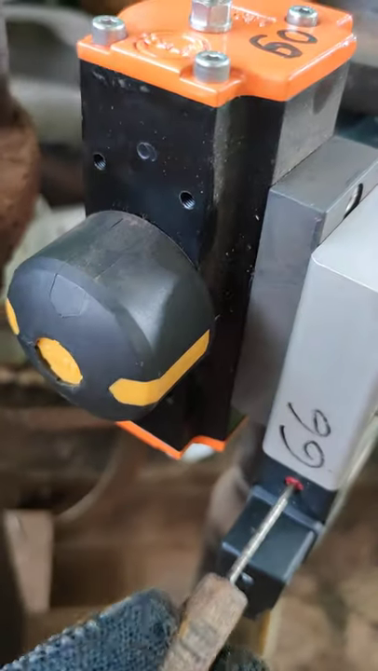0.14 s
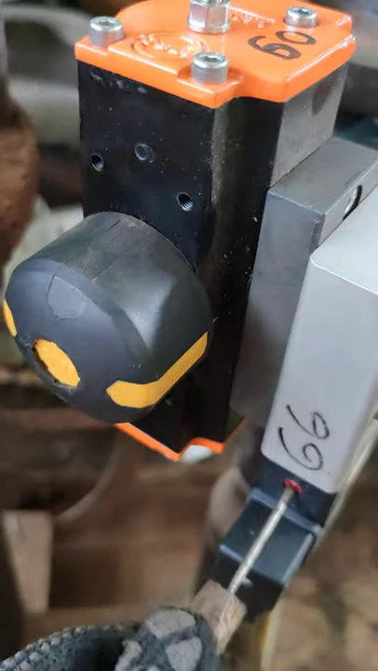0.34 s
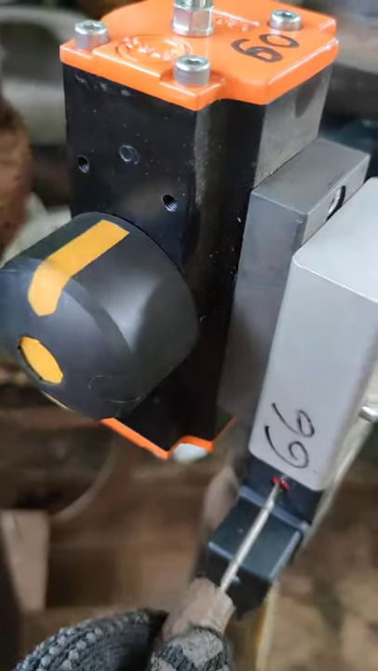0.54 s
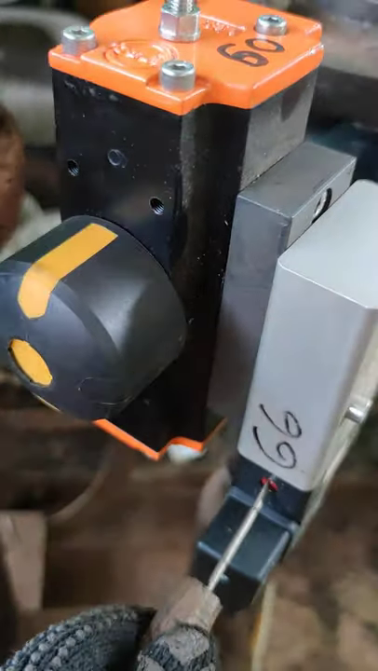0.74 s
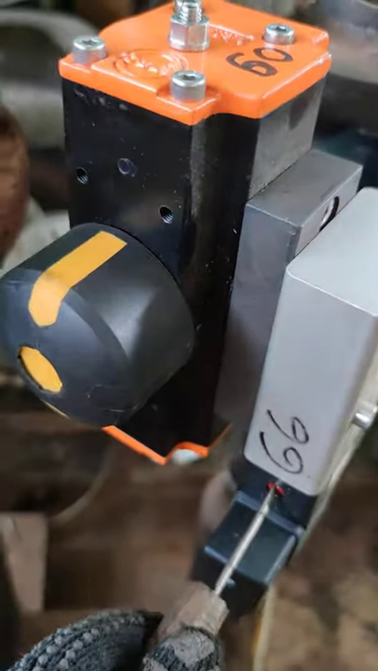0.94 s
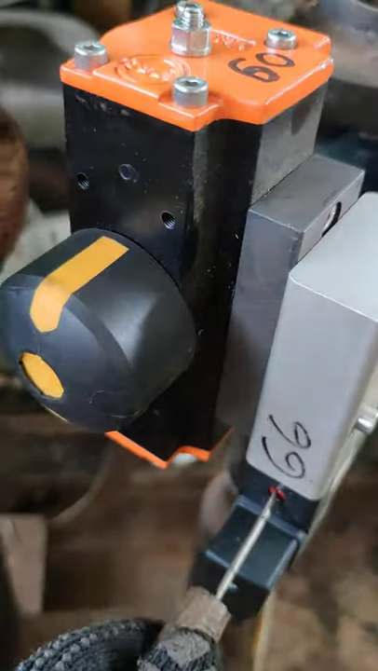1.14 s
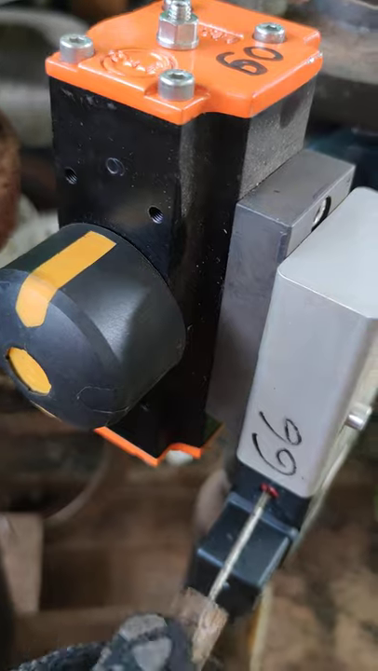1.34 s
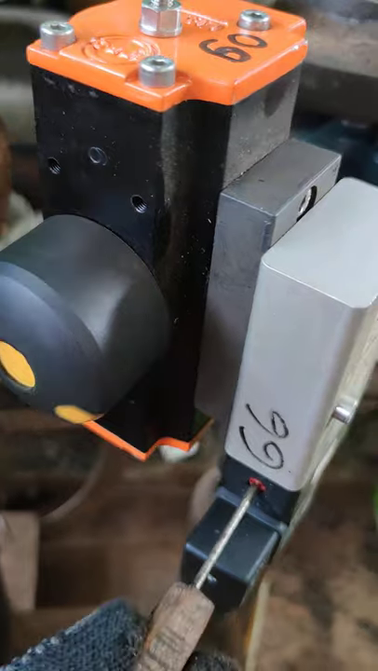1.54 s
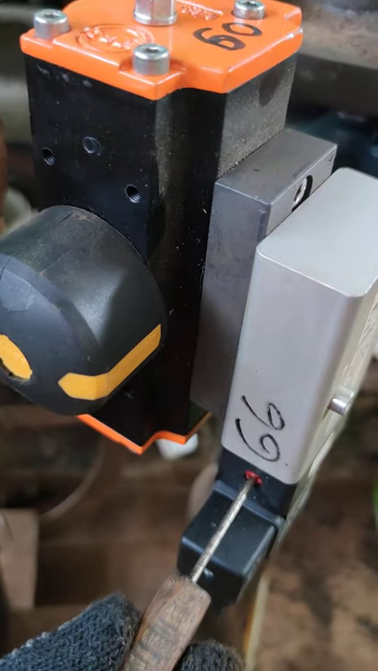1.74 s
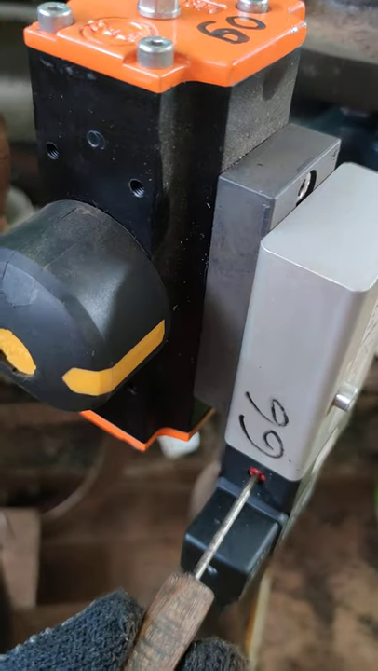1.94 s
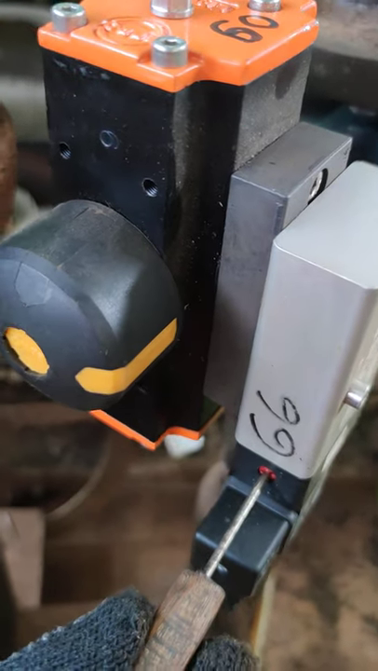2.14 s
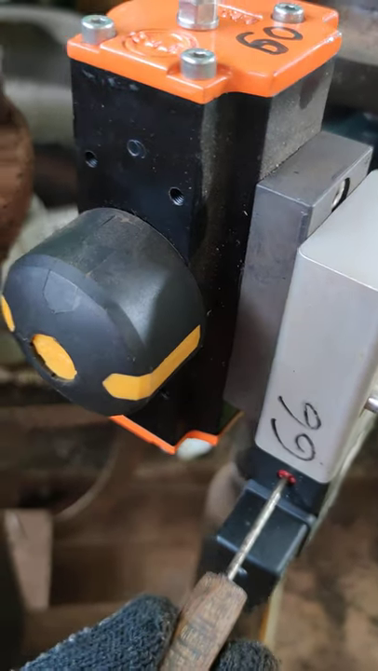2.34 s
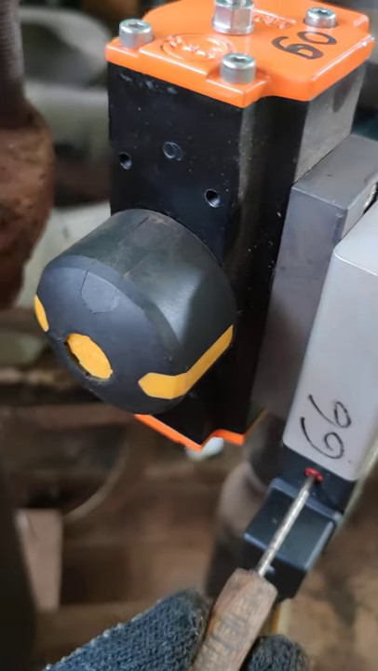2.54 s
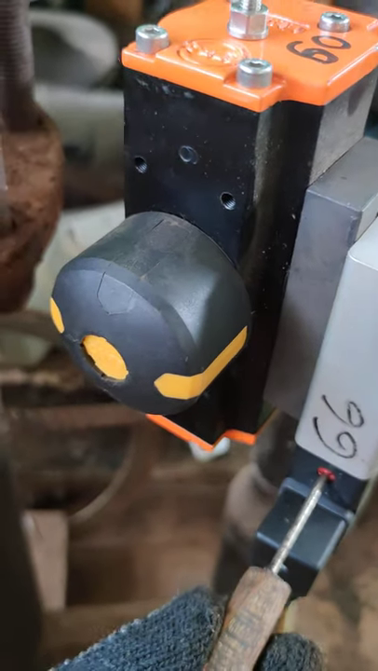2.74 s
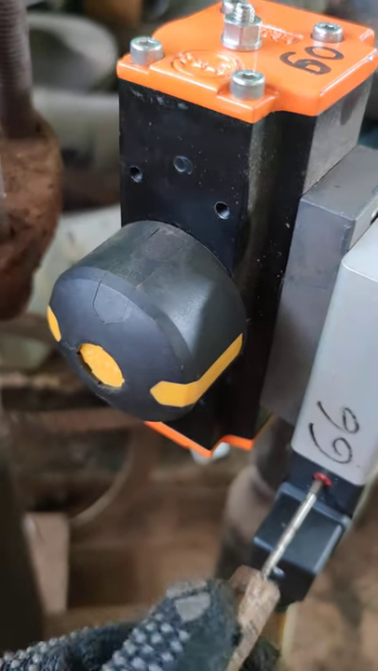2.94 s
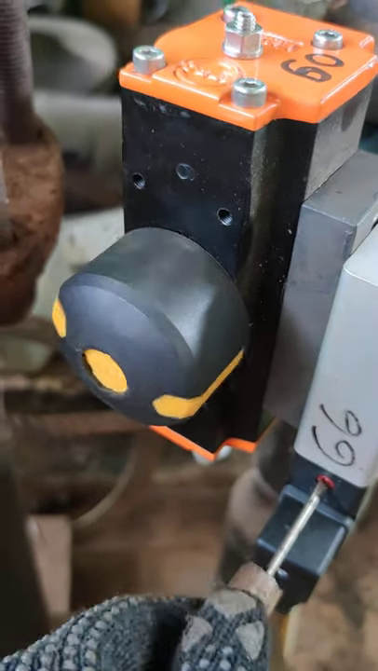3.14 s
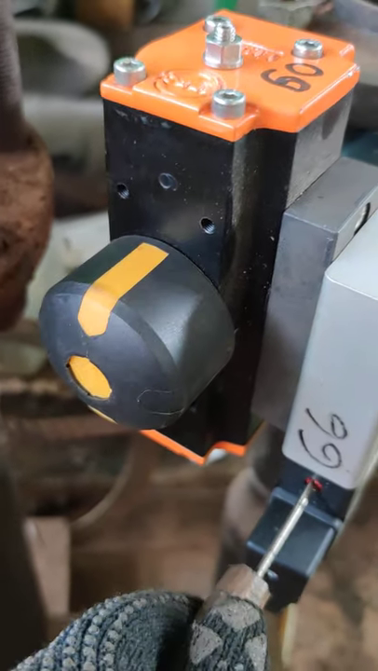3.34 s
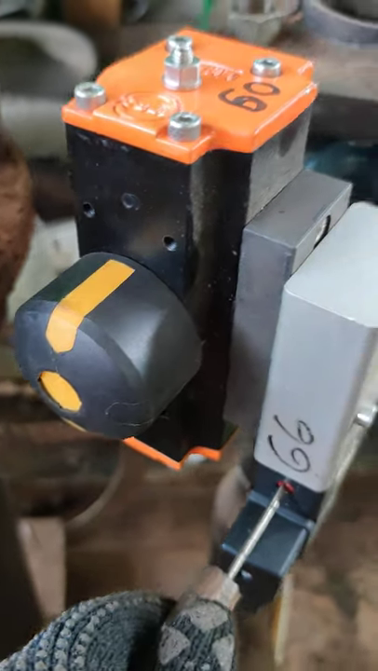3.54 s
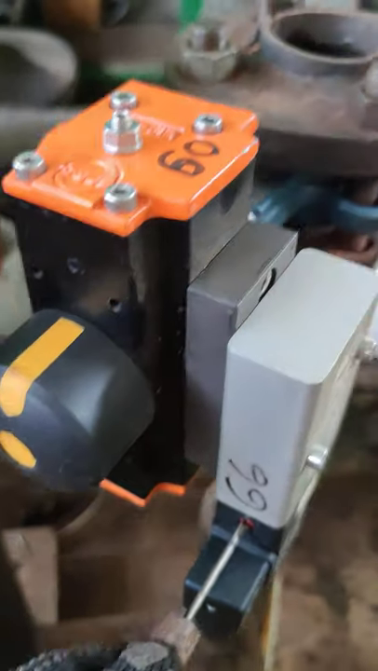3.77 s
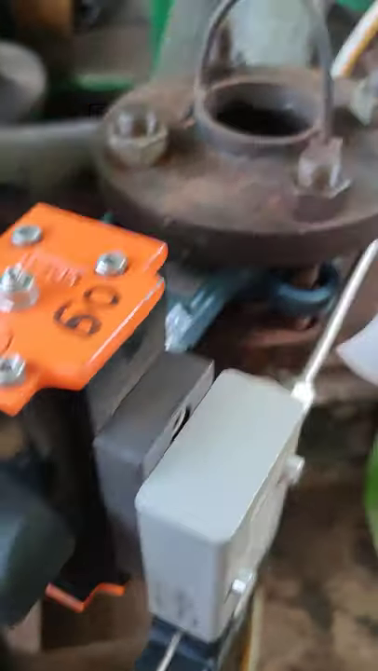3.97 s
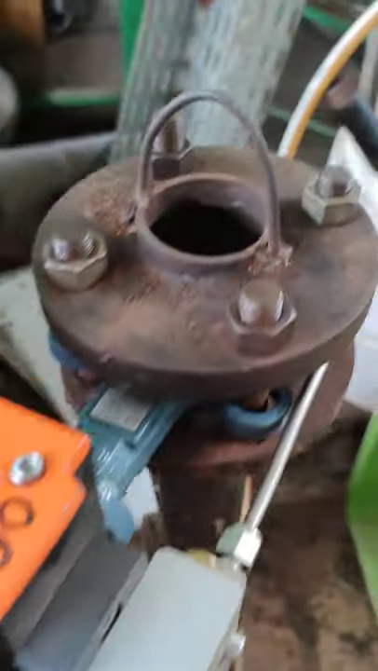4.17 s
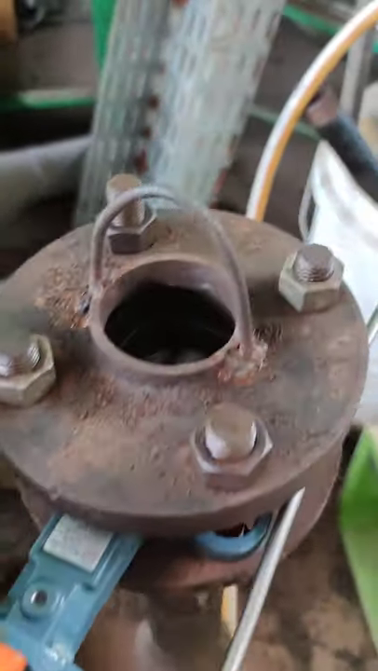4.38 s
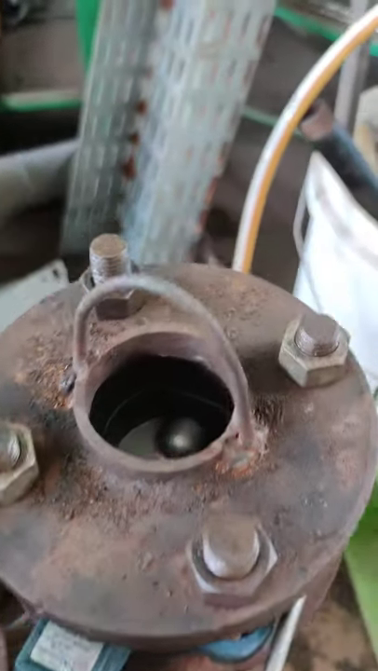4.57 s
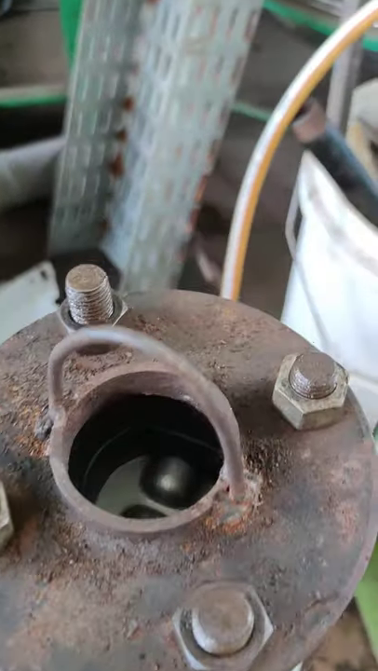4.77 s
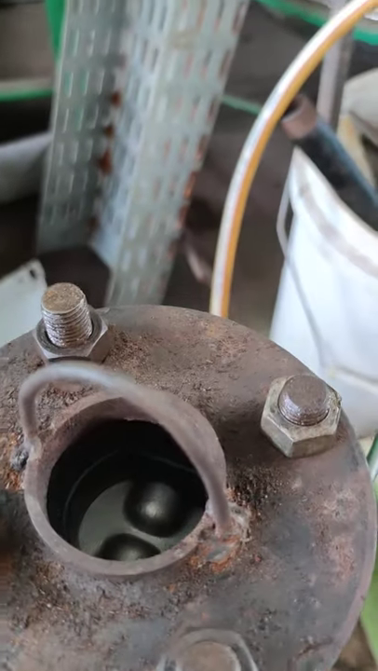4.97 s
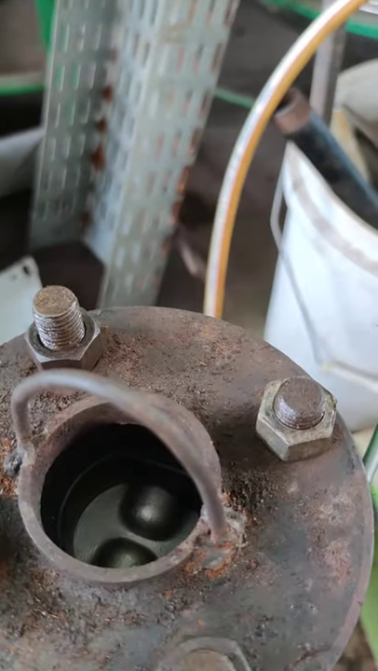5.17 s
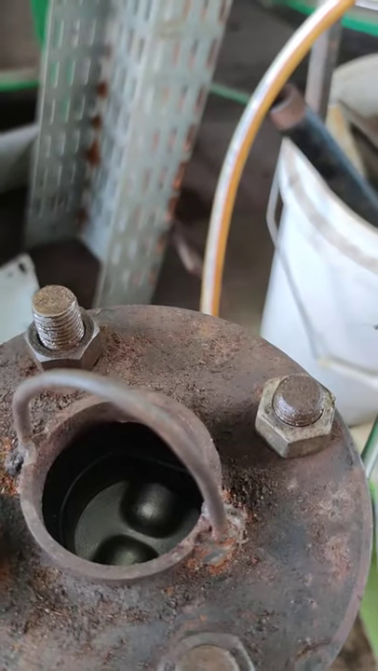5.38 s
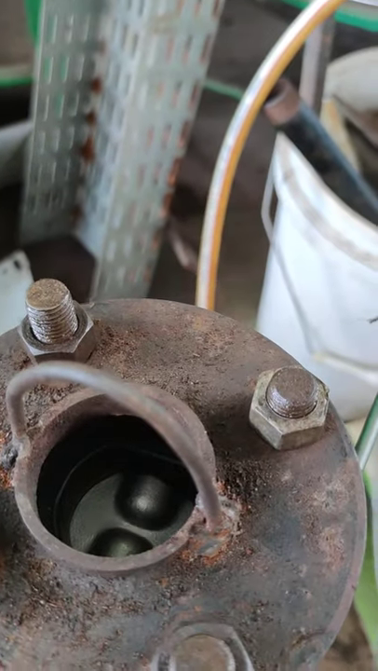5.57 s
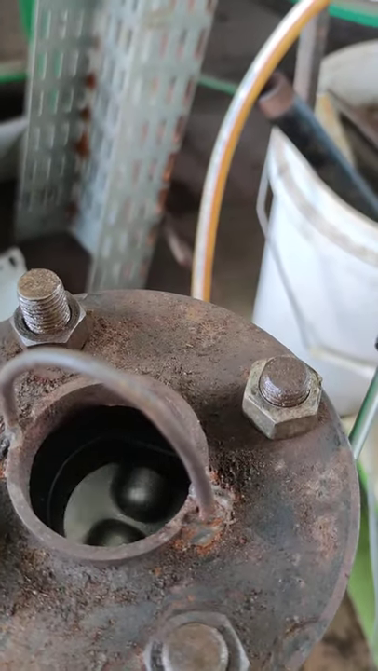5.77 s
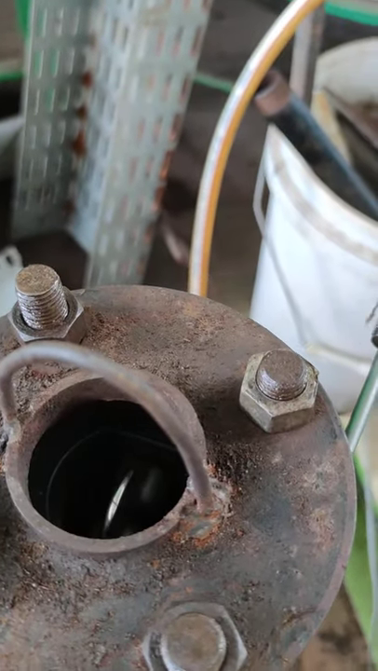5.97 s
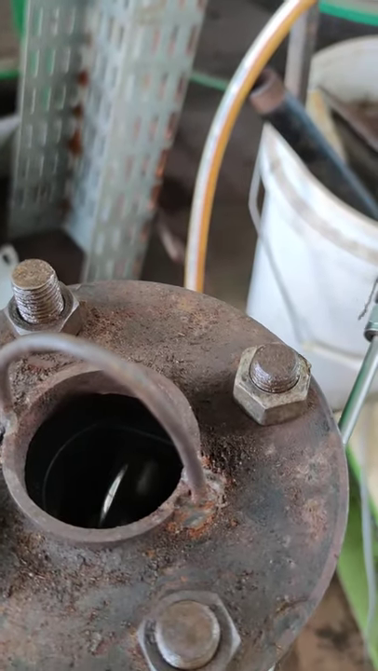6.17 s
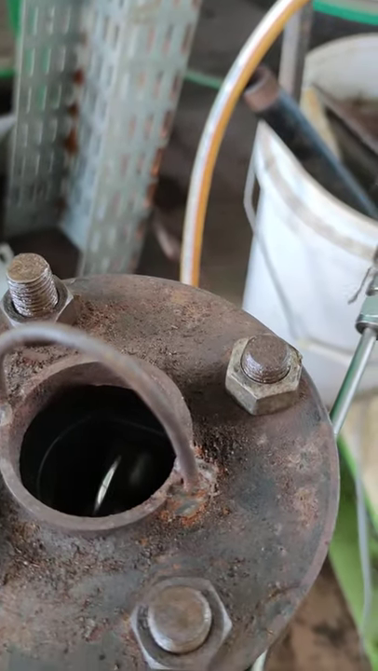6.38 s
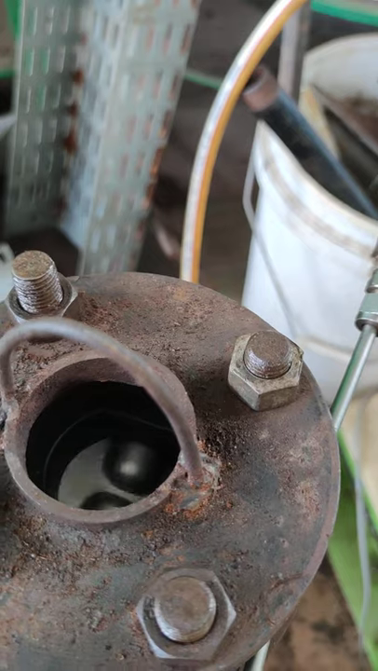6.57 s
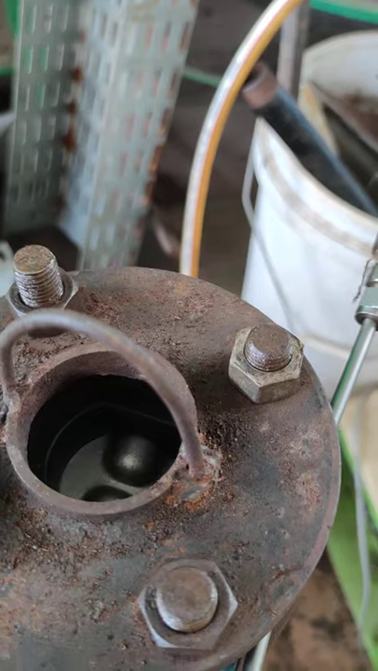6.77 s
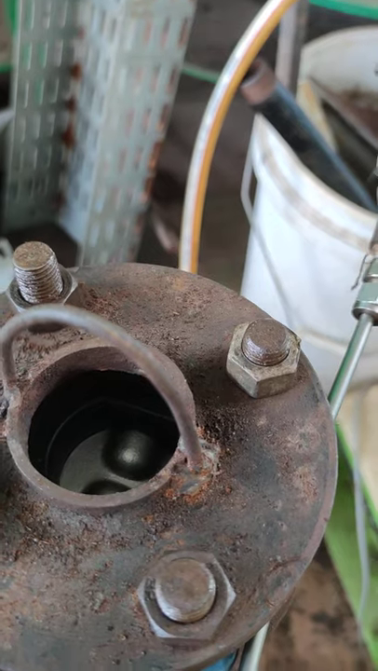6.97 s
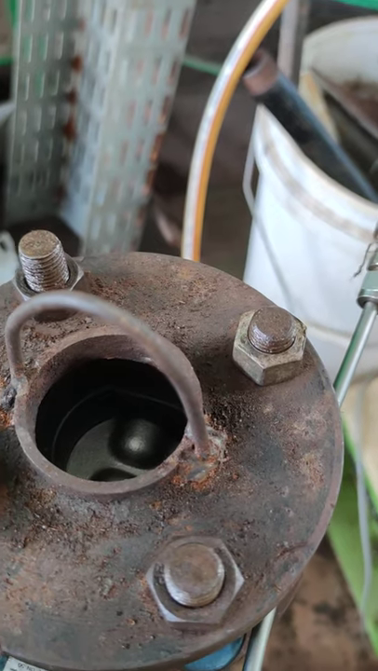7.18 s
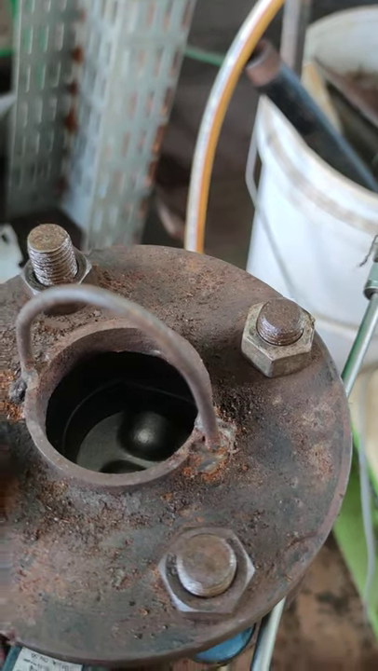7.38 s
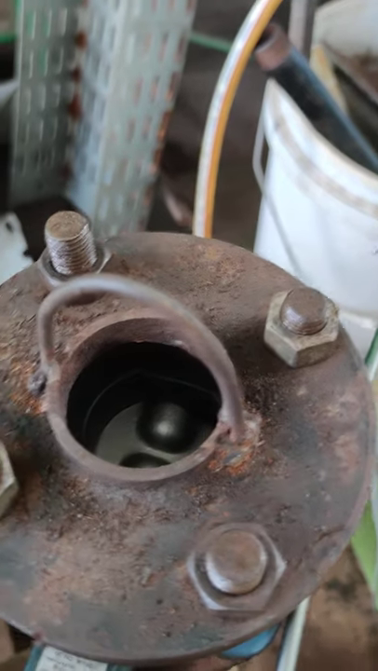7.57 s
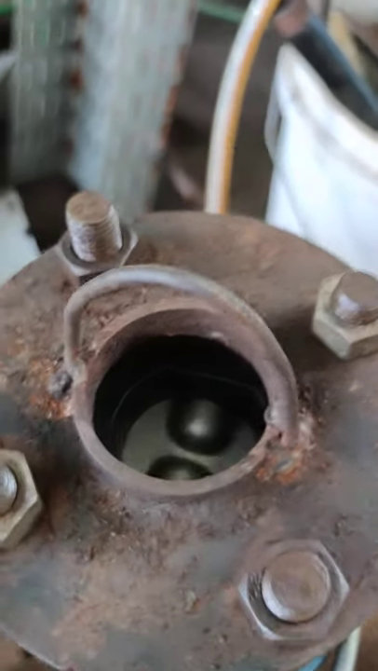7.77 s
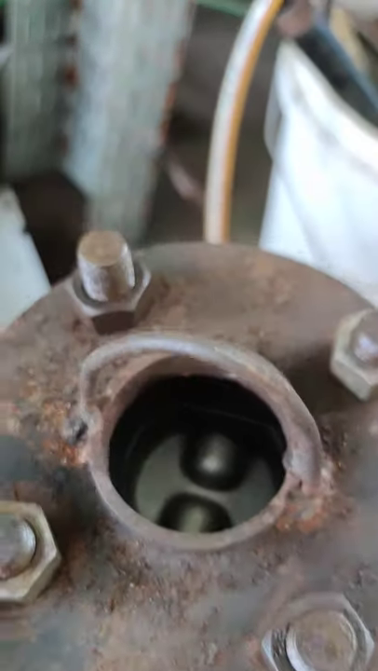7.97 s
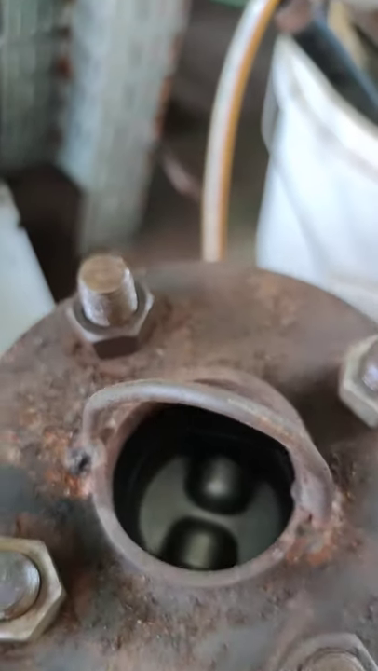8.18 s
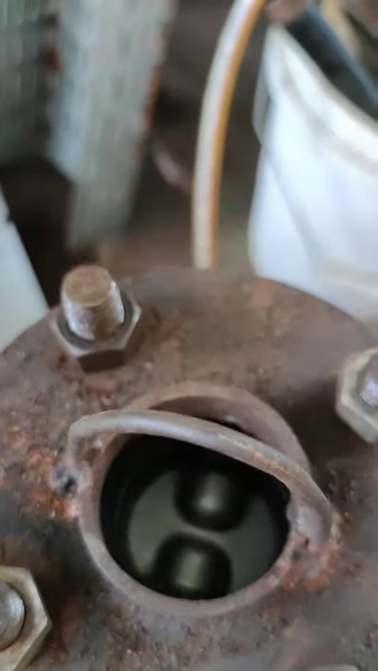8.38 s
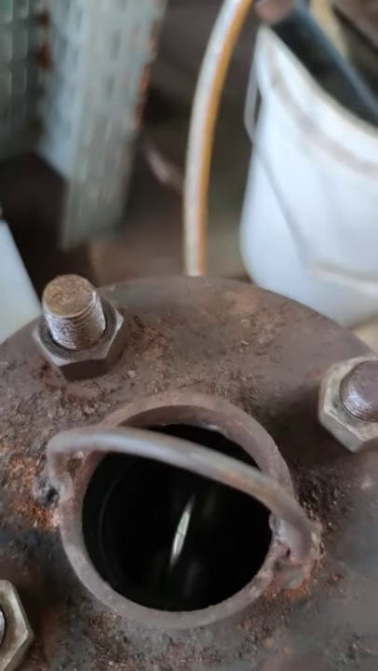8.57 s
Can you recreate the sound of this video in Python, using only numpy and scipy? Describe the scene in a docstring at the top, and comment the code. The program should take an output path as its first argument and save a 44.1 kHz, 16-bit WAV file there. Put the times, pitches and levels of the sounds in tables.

```python
"""In a workshop, close to a pneumatic actuator that is switched back and forth by hand; a phone with two
unlike microphones. Each stroke is a tick, a noise blast with a damped sine thump, and a rebound.
In one position the valve squeaks open (gliding tones) and leaks (filtered noise).
The phone moves from the actuator to the pipe flange, so the hiss shifts between the microphones.
Behind lie the room's echoes, the shop drone with distant machines, and a draught."""
import sys
import numpy as np
from scipy import signal
from scipy.fft import rfft, irfft, next_fast_len
from scipy.io import wavfile
from scipy.ndimage import uniform_filter1d

SR = 44100
rng = np.random.default_rng(int(sys.argv[2]) if len(sys.argv) > 2 else 0)


def store_wav(level_fs):
    """Save 16-bit WAV to argv[1]."""
    pcm = np.round(np.clip(np.atleast_2d(level_fs), -1, 1) * 32767)
    wavfile.write(sys.argv[1], SR, pcm.T.astype(np.int16))


N = 380141  # length in samples

# spectrum of rushing air before tilt and level: (f/Hz, relative density/dB)
BLAST_SPECTRUM = [(60, -56), (200, -58), (600, -51.5), (1100, -53), (2000, -50.5), (3300, -51),
                  (5000, -55.5), (7600, -51), (11000, -58.5), (16000, -62)]
# modes of the actuator housing: (f/Hz, width/Hz, relative level/dB)
BODY = [(160, 81, 9.5), (600, 77, 2), (1144, 82, 3), (1600, 260, 3), (2000, 85, 0), (2490, 33, -4),
        (2820, 63, 6), (3530, 300, 3.5), (4400, 150, -4.5)]


def body_power(hz):
    """Summed resonance power of the housing modes at each frequency."""
    return sum(gain_of(2 * db) / (1 + (2 * (hz - f) / width) ** 2) for f, width, db in BODY)


def blow(db, pan_db, t60, thump_db, treble_db, low_hz=30, rise=0.0011):
    """A clumpy burst of air that also rings the housing, over one low swing of pressure."""
    t = np.arange(SR // 4) / SR
    shape = (1 - np.exp(-t / rise)) * gain_of(-60 * t / t60)
    shape *= gain_of(2.2 * wander(len(t), 600))
    shape *= 1 + 1.12 * np.exp(-t / 0.0026)  # the crack of metal on metal leads
    noise = rng.standard_normal((3, len(t)))
    air = shape * pair(noise, 0.3) * np.sqrt(SR / 2)

    def burst_db(hz):
        ringing_db = 10 * np.log10(1.0 + 0.62 * body_power(hz))
        return read(BLAST_SPECTRUM, hz) + ringing_db + treble_db * hz / (hz + 5000)

    burst = passed(colour(air, burst_db), "high", low_hz)
    thump = -1.12 * gain_of(thump_db) * np.sin(2 * np.pi * 165 * t) * np.exp(-t / 0.003)
    return (gain_of(db) * burst + thump) * sides(pan_db)


# the piston slams home:
# (t/s, air level/dB, left over right/dB, t60/s, relative thump level/dB, treble tilt/dB)
BLASTS = [(.488, 0.5, -1.5, 0.14, -5.5, -1.5), (1.561, -2, -2.5, 0.17, -6.5, -3.5),
          (3.202, 0, -2, 0.16, -7, -4), (4.151, -3, -3.5, 0.21, -8, -1), (5.827, 2, 1, 0.13, -10, -2),
          (6.585, -2.5, -5, 0.18, -7.5, 2), (8.5215, 1, -4.5, 0.11, -17, 0)]


def blasts(rig):
    """Air bursts out as the piston slams home."""
    for s, *row in BLASTS:
        add(rig, s, blow(*row, rise=0.0019))


# the spool just ahead of each blast: (t/s, air level/dB, treble tilt/dB)
TICKS = [(.477, -9, -24), (1.548, -15, 1), (3.189, -9, -19), (4.142, -14.5, 12), (5.816, -1, -27),
         (6.576, -8, -5), (8.506, -7, 2)]


def ticks(rig):
    """The spool ticks: very short, centred bursts with little thump."""
    for s, db, treble_db in TICKS:
        add(rig, s, blow(db, 0, 0.036, -30.5, treble_db))


# band of the housing that a rebound excites: (lower f/Hz, upper f/Hz)
KNOCK_BAND_HZ = [910, 3300]
KNOCK_DAMPING = 2.6  # times the free decay rate: the piston holds the housing


def knock(db, pan_db):
    """A rebound strikes the housing: a short ring of its middle modes."""
    t = np.arange(SR // 20) / SR
    ring = 0
    for f, width, mode_db in BODY:
        phase = 2 * np.pi * (f * t + rng.random((2, 1)) * 0.18)  # differs between the microphones
        ring = ring + gain_of(mode_db) * np.sin(phase) * np.exp(-np.pi * width * KNOCK_DAMPING * t)
    ring = passed(ring * np.clip(t / 0.0004, 0, 1), "band", KNOCK_BAND_HZ)
    return gain_of(db) * ring * sides(pan_db)


# the piston comes back off its stop: (t/s, air level/dB, left over right/dB, relative thump level/dB)
REBOUNDS = [(.577, 0.5, 1, -26), (1.665, -7.5, 9, -13.5), (1.687, -13, 0, -44), (3.291, 3, 2.7, -23.5),
            (4.279, -10, -1, -32), (5.9158, 0.5, 1, -21), (6.689, -17, -1.1, -28), (6.711, -27, 0.1, -37),
            (8.611, -10, -10, -37)]


def rebounds(rig):
    """The piston rebounds: a short burst with little body, and a knock of the housing."""
    for s, db, pan_db, thump_db in REBOUNDS:
        add(rig, s, blow(db, pan_db, 0.02, thump_db, -9.5, low_hz=910))
        add(rig, s, knock(db - 21, pan_db))


def squeak(length, db, start_hz, end_hz):
    """A whistle that slides quickly to its pitch, with an octave overtone and an unsteady level."""
    t = np.arange(SR // 50) / SR
    glide_hz = end_hz + (start_hz - end_hz) * np.exp(-t / 0.001)
    phase = 2 * np.pi * np.cumsum(glide_hz) / SR
    shape = np.clip(t / 0.00032, 0, 1) * np.exp(-np.clip(t - length, 0, None) / 0.000098)
    shape *= 1 + 0.35 * wander(len(t), 700)
    tone = np.sin(phase) + gain_of(-8.5) * np.sin(2 * phase)
    return gain_of(db) * shape * tone * sides(3.4)


# the spool seal: (t/s, length/s, level of the fundamental/dB, start f/Hz, end f/Hz)
SQUEAKS = [(1.5197, 0.0042, -8, 4630, 6860), (1.547, 0.0041, -10.5, 7800, 7020),
           (1.554, 0.0077, -18, 6950, 7080), (4.109, 0.0032, -10.5, 5350, 7000),
           (4.114, 0.0026, -15, 6700, 6750), (4.139, 0.0052, -11, 7330, 7190),
           (6.547, 0.0074, -13, 6060, 6740), (6.5715, .0045, -14.5, 7500, 7130)]


def squeaks(rig):
    """The spool seal whistles as it slides."""
    for s, *row in SQUEAKS:
        add(rig, s, squeak(*row))


# each opening of the valve: (opens t/s, first lift of the leak/dB,
# time for that dB lift to fall to a thousandth/s, shuts t/s)
VALVE = [(-.02, 5.5, 0.81, 0.48), (1.509, 11, 0.2, 3.244), (4.097, 7, 0.31, 5.828), (6.535, 14, 0.35, 8.68)]
# spectrum of the leaking air before level: (f/Hz, relative density/dB)
LEAK_SPECTRUM = [(700, -59.5), (1500, -57), (2350, -47.5), (2700, -36.5), (3400, -38), (4000, -40),
                 (4650, -42.5), (5100, -40), (6500, -36.5), (7600, -36.5), (10000, -43.5), (12000, -49),
                 (14000, -49.5), (16000, -42)]
# flow through the open port, swelling as the hand presses to shut it: (t/s, level/dB)
FLOW = [(0.0, -34.5), (0.36, -29.5), (0.45, -29), (1.72, -33.5), (2.2, -36), (2.94, -36), (3.06, -31),
        (3.16, -31), (4.32, -35), (4.45, -34), (4.68, -37.5), (5.61, -36.5), (5.64, -42), (5.75, -37.5),
        (6.8, -41), (8.26, -41), (8.44, -36)]
# how the phone faces the jet:
# (t/s, left over right before a fixed -3 dB shift/dB, top band level/dB, top band centre f/Hz)
FACING = [(0.0, 4.5, -5, 13200), (3.2, 4.5, -1.5, 13900), (4.35, 2, 1.5, 12400), (4.7, 0.5, 4.5, 13100),
          (4.95, -1, 8, 13900), (5.25, -0.3, 4, 14100), (5.7, 0, 3.5, 13600), (6.9, -1, 9.5, 13800),
          (7.65, 0, 5.5, 13700), (7.9, 1.5, 5, 14400), (8.44, 2.5, -3, 13700)]
# bands that the flange throws back: (f/Hz, width/Hz, level/dB)
FLANGE = [(3170, 270, -11), (4620, 230, -1.5)]
FLANGE_S, FLANGE_RISE_S = 4.35, 0.3  # the phone comes over the flange
LOW_DB = 4  # lift of the low hiss/dB
# extra lift at each opening but the first/dB, time for it to fall to a thousandth/s, its build-up time/s
LOW_RUSH_DB, LOW_RUSH_T60, LOW_RUSH_RISE_S = 7, 0.83, 0.052


def leak():
    """Air hissing through the open port; its colour shifts as the phone turns."""
    t = np.arange(N) / SR
    level_db, = curves(FLOW)
    pan_db, top_db, top_hz = curves(FACING)
    flow, low_db = np.zeros(N), LOW_DB
    for opens, rush_db, t60, shuts in VALVE:
        held = (t > opens) & (t < shuts)
        since = np.clip(t - opens, 0, None)
        rush = gain_of(rush_db * gain_of(-60 * since / t60))  # the lift in dB dies away
        flow += held * rush * np.clip(since / 0.01, 0, 1) ** 2
        low_rise = np.clip(since / LOW_RUSH_RISE_S, 0, 1) ** 4
        low_rush_db = LOW_RUSH_DB * gain_of(-60 * since / LOW_RUSH_T60)
        low_db = low_db + held * (opens > 0) * low_rise * low_rush_db
    noise = hiss(lambda hz: read(LEAK_SPECTRUM, hz), channels=3)
    flutter_db = 1.0 * wander(N, 190) + 0.14 * wander(N, 28)
    jet = pair(noise, 0.41) * gain_of(level_db + flutter_db)
    low = passed(jet, "low", 3150, order=4)
    # reflections off the flange lift a band that slides
    top = resonate(resonate(jet, top_hz, 2450), top_hz, 2450)
    bands = sum(gain_of(db) * resonate(jet, np.full(N, hz), width) for hz, width, db in FLANGE)
    bands *= np.clip((t - FLANGE_S) / FLANGE_RISE_S, 0, 1)
    coloured = jet + (gain_of(low_db) - 1) * low + gain_of(top_db) * top + bands
    return flow * coloured * sides(pan_db - 3.0)


# one bright spit: (air level/dB, left over right/dB, t60/s, relative thump level/dB, treble tilt/dB)
SPIT = (-34, 12, 0.045, -48, 21)


def spits(rig):
    """Air spits brightly 9.8 ms after each opening but the first."""
    for opens, *_ in VALVE[1:]:
        add(rig, opens + 0.0098, blow(*SPIT))


def bump(db, length):
    """A dull knock in the case that swings back slowly, mostly at the right microphone."""
    t = np.arange(SR // 8) / SR
    dip = -np.sin(np.pi * np.clip(t / length, 0, 1)) ** 2
    after = np.clip(t - length, 0, None)
    swing = 190 * length * np.sin(2 * np.pi * 59 * after) * np.exp(-after / 0.028)
    return gain_of(db) * (dip + swing) * np.array([[0.5], [1.5]])


# the hand shifting on the phone: (t/s, level before the left-right split/dB, length of the dip/s)
BUMPS = [(3.725, -33, 0.0025), (3.734, -32, 0.0036), (3.79, -30, 0.002), (3.828, -35, 0.0021),
         (3.862, -34, 0.0039), (3.892, -25, 0.0033), (3.922, -33, 0.0033), (4.865, -32, 0.0029)]


def bumps(case):
    """The hand shifts on the phone and knocks its case, without any room."""
    for s, *row in BUMPS:
        add(case, s, bump(*row))


# decay of the room's tail: (f/Hz, t60/s)
ROOM = [(150, 0.54), (1000, 0.68), (3000, 0.57), (8000, 0.56), (14000, 0.32)]


def room(x):
    """Direct sound, close reflections off the rig and a tail that builds up from the far walls.
    All change as the phone moves, and the other microphone becomes the nearer one."""
    size, lag, total = next_fast_len(N + SR), np.arange(SR) / SR, 0
    moved = np.clip((np.arange(N) / SR - 4.2) / 0.093, 0, 1) * np.pi / 2
    places = (np.cos(moved), (0, 14)), (np.sin(moved), (10, 0))  # share, direct delays in samples
    for share, direct in places:
        # sparse echoes of random sign, one in every 20 samples
        taps = np.zeros((2, SR))
        at = np.arange(20, SR - 20, 20) + rng.integers(0, 20, (2, (SR - 21) // 20))
        np.put_along_axis(taps, at, rng.choice([-1., 1.], at.shape), 1)
        early = taps * gain_of(-60 * lag / 0.086)
        gathering = 1 - np.exp(-(lag / 0.072) ** 2)
        hz, s, z = signal.stft(taps * gathering, SR, nperseg=256)
        decay = gain_of(-60 * s / read(ROOM, hz)[:, None])
        late = signal.istft(z * decay, SR, nperseg=256)[1][:, :SR]
        path = gain_of(-2.0) * early / np.linalg.norm(early[0])
        path = path + gain_of(-14.0) * late / np.linalg.norm(late[0])
        path = passed(path, "high", 217)  # little bass returns
        path[(0, 1), direct] = 1
        total = total + rfft(x * share, size) * rfft(path, size)
    return irfft(total, size)[:, :N] * gain_of(-2.0)


# workshop drone before its drift: (f/Hz, density/dB per Hz)
SHOP = [(60, -71), (120, -79), (190, -74.5), (250, -80.5), (330, -83), (600, -83), (1200, -90.5),
        (2000, -93), (4000, -100), (5500, -102), (7600, -99), (9000, -103), (12000, -120)]
# distant machines: (mean f/Hz, level before its drift/dB)
HUM = [(253.0, -61), (317.6, -66.5), (441.4, -72.5), (506.0, -66), (694.4, -71.5)]


def drone():
    """Steady noise of the workshop, partly shared by both microphones, with drifting hums."""
    a, b, c = hiss(lambda hz: read(SHOP, hz), channels=3)
    mix = np.array([0.68 * a + 0.73 * b, 0.58 * a + 0.59 * c]) * gain_of(1.0 * wander(N, 2.4))
    for hz, db in HUM:
        level = gain_of(db + 3.6 * wander(N, 1.3))
        mix += level * np.sin(2 * np.pi * np.cumsum(hz + 1.49 * wander(N, 3.85)) / SR)
    return mix


# spectrum of the draught before its gusts: (f/Hz, relative density/dB)
RUMBLE = [(5, -8), (20, -10.5), (40, -5.5), (65, -15), (90, -18.5), (150, -35), (400, -74)]
# swell of the draught: (t/s, level/dB)
GUSTS = [(0.0, -55.5), (0.72, -51), (1.22, -56.5), (1.63, -48.5), (2.04, -55.5), (3.0, -58.5), (3.29, -49),
         (3.77, -56.5), (4.34, -45), (5.2, -55), (6.3, -53.5), (6.65, -50.5), (7.28, -56.5), (7.8, -48),
         (8.62, -48)]


def draught():
    """Gusty low rumble, independent at each microphone and stronger at the right."""
    gust_db = curves(GUSTS)[0] + 1.56 * wander(N, 18)
    rumble = hiss(lambda hz: read(RUMBLE, hz), channels=2)
    return rumble * gain_of(gust_db) * gain_of([[-1.5], [1.5]])


def gain_of(db):
    """Decibels to amplitude."""
    return 10 ** (np.asarray(db) / 20)


def read(points, hz):
    """A spectrum table read on a log-frequency axis."""
    f, value = np.transpose(points)
    return np.interp(np.log(hz + 1), np.log(f + 1), value)


def curves(rows):
    """Columns of a table joined by straight lines in time."""
    s, *columns = np.transpose(rows)
    return [np.interp(np.arange(N) / SR, s, c) for c in columns]


def add(mix, s, sound):
    """Mixes a stereo sound in at time s."""
    part = mix[:, round(s * SR):][:, :sound.shape[1]]
    part += sound[:, :part.shape[1]]


def colour(x, db_at):
    """Causal minimum-phase filter whose gain in dB is db_at(Hz)."""
    log_gain = np.log(gain_of(db_at(abs(np.fft.fftfreq(8192, 1 / SR)))))
    taps = np.fft.ifft(np.exp(log_gain - 1j * signal.hilbert(log_gain).imag)).real[:4096]
    return signal.oaconvolve(np.atleast_2d(x), taps[None], axes=-1)[:, :x.shape[-1]]


def hiss(db_at, channels=1):
    """Full-length noise with the given density in dB per Hz."""
    size = next_fast_len(N)
    white = rfft(rng.standard_normal((channels, size))) * np.sqrt(SR / 2)
    return irfft(white * gain_of(db_at(np.fft.rfftfreq(size, 1 / SR))), size)[:, :N]


def wander(count, hz):
    """Random drift with standard deviation 1: noise averaged twice over 1/hz seconds."""
    width = round(SR / hz)
    x = uniform_filter1d(uniform_filter1d(rng.standard_normal(count), width), width)
    return x / x.std()


def sides(pan_db):
    """Gains of both microphones when the right one is shaded by pan_db."""
    return np.vstack([np.ones_like(pan_db), gain_of(-pan_db)])


def pair(own, alike):
    """Two noises that share the third: a wide jet sounds only partly alike at both microphones."""
    return np.sqrt(alike) * own[2] + np.sqrt(1 - alike) * own[:2]


def resonate(x, hz, width):
    """Shifts the curve hz down to zero, smooths, and shifts back: a moving resonance of gain 1."""
    turn = np.exp(2j * np.pi * np.cumsum(hz) / SR)
    r = np.exp(-np.pi * width / SR)
    return 2 * (turn * signal.lfilter([1 - r], [1, -r], x * turn.conj())).real


def passed(x, kind, hz, order=2):
    """Butterworth filter."""
    return signal.sosfilt(signal.butter(order, hz, kind, fs=SR, output="sos"), x)


def scene():
    """Everything that reaches the two microphone ports."""
    rig, case = leak(), drone() + draught()
    for play in (blasts, ticks, rebounds, spits, squeaks):
        play(rig)
    bumps(case)
    return room(rig) + case


# left port, with a sharp peak: (f/Hz, gain/dB)
LEFT_MIC = [(100, -5.5), (400, -1.5), (4000, 3), (5500, 3), (6500, 3), (7200, 8.5), (7700, 10.5),
            (8200, 7.5), (8700, 3.5), (9200, 1), (11000, -5.5), (13000, -5.5), (16000, -11)]
# right port, with a deep valley under a higher peak: (f/Hz, gain/dB)
RIGHT_MIC = [(100, -1), (400, -1), (3400, 0), (4500, -1.5), (6500, -12.5), (7400, -23), (8500, -20.5),
             (10300, -20), (11800, 0), (13500, 1), (15000, -11), (16000, 2)]


def record(dry):
    """Each port's colour, a slow swing of the left after loud sound, self-noise, soft clipping, band limit."""
    left = colour(dry[0], lambda hz: read(LEFT_MIC, hz))[0]
    right = colour(dry[1], lambda hz: read(RIGHT_MIC, hz))[0]
    swing = passed(left ** 2, "band", [2.6, 11.0])  # follows the signal's power
    self_noise = rng.standard_normal(dry.shape) * gain_of([[-70.5], [-68.5]])
    offset = [[-0.0024], [-0.0005]]
    mix = np.array([left - 1.57 * swing, right]) + self_noise + offset
    mix = 0.97 * np.tanh(mix / 0.97)
    band_limit = signal.firwin(511, 15800, window=("kaiser", 9), fs=SR)
    return signal.oaconvolve(mix, band_limit[None], "same")


dry = scene()
out = record(dry)
store_wav(out)
```